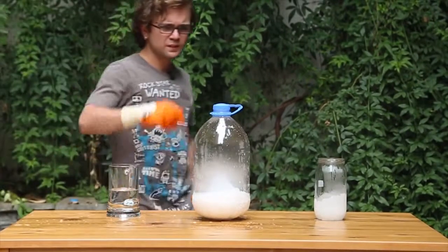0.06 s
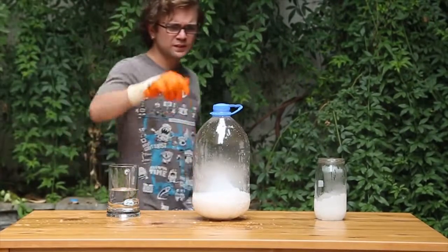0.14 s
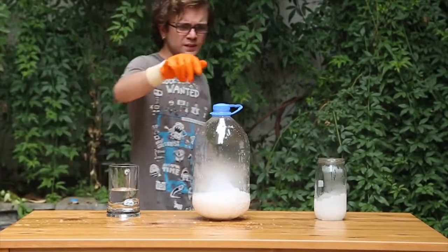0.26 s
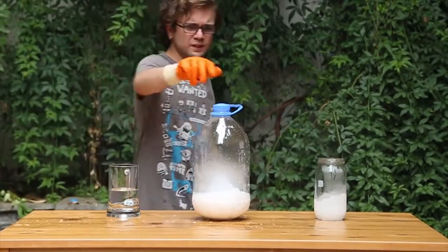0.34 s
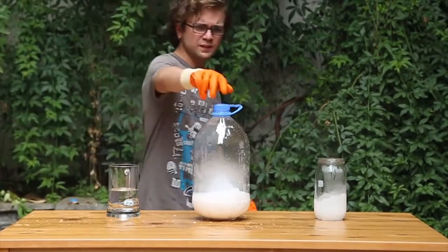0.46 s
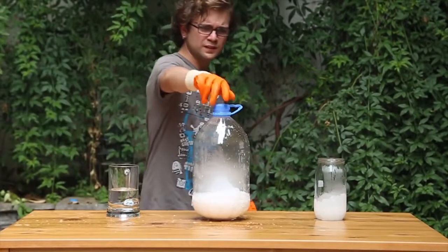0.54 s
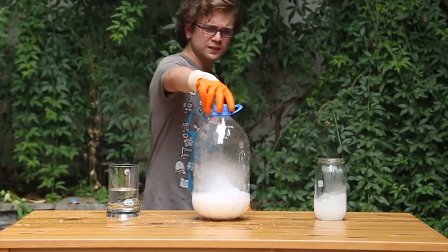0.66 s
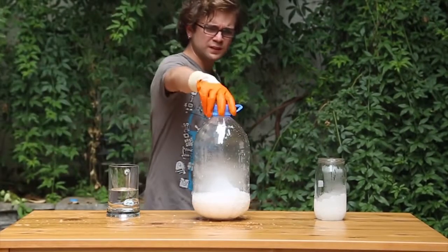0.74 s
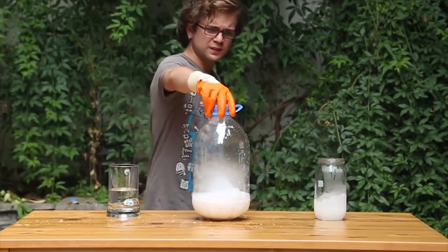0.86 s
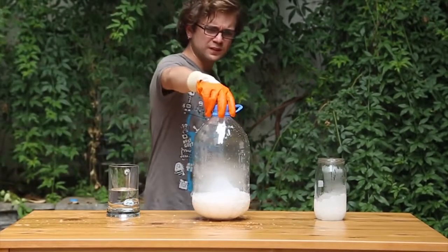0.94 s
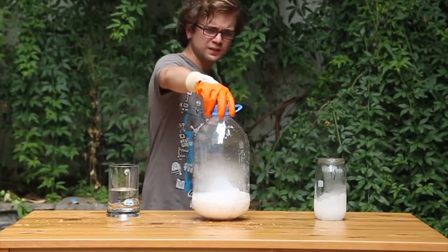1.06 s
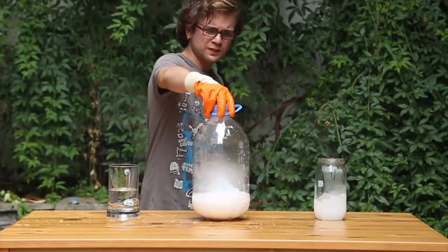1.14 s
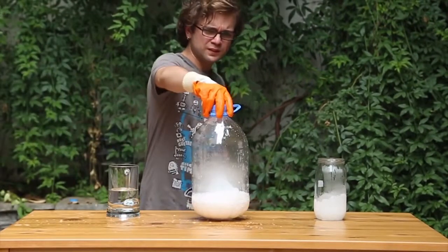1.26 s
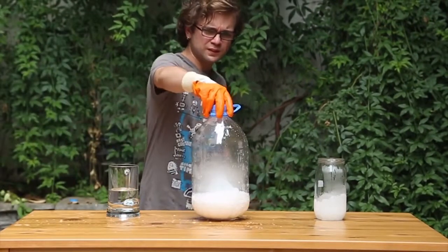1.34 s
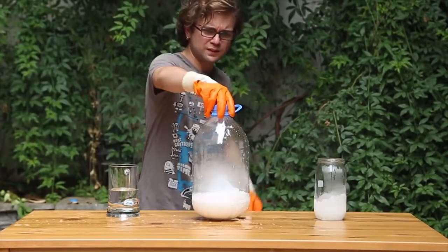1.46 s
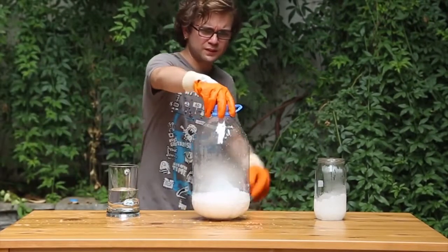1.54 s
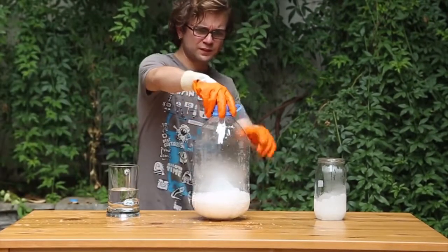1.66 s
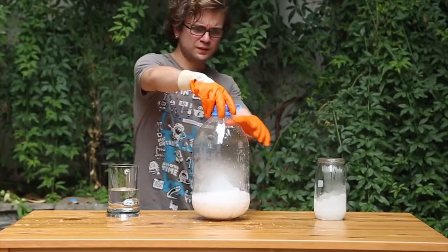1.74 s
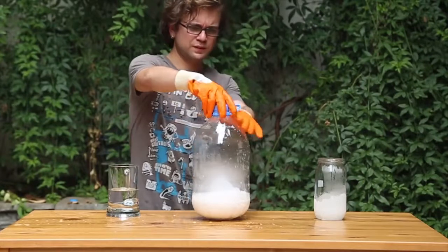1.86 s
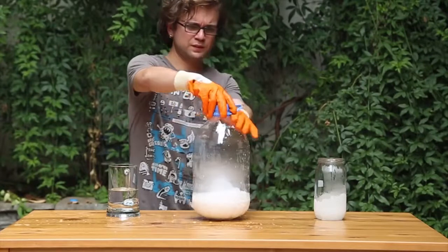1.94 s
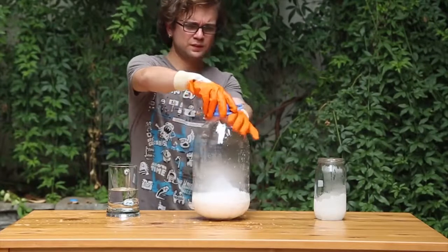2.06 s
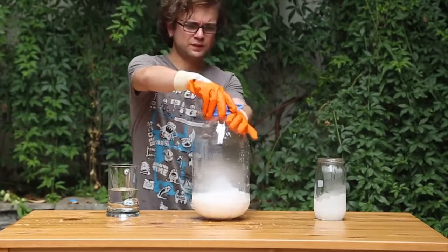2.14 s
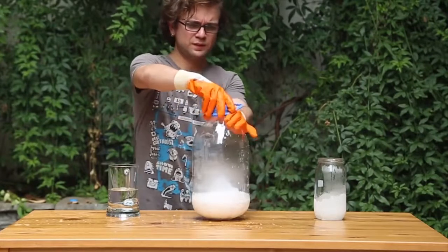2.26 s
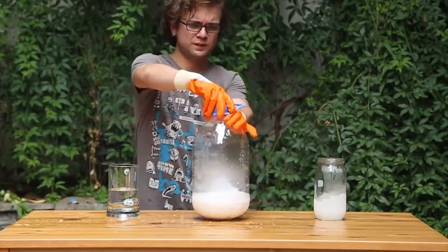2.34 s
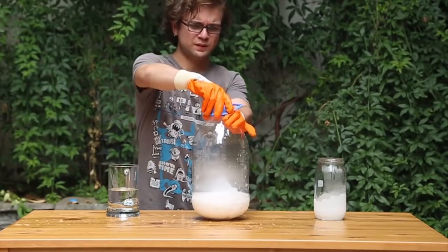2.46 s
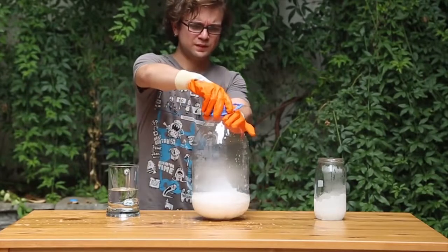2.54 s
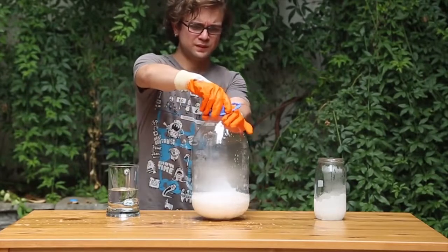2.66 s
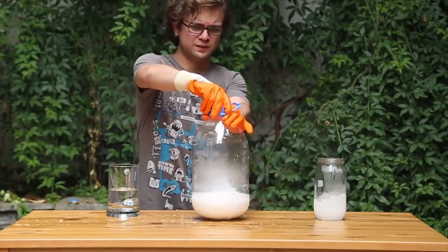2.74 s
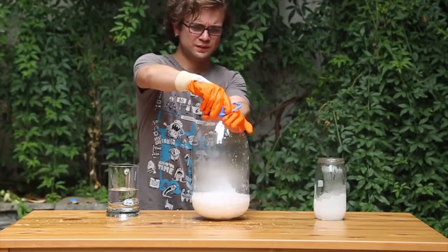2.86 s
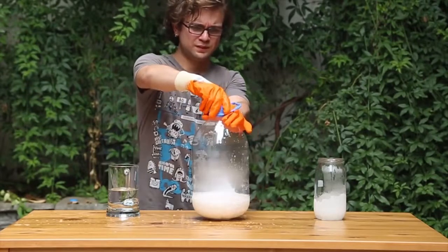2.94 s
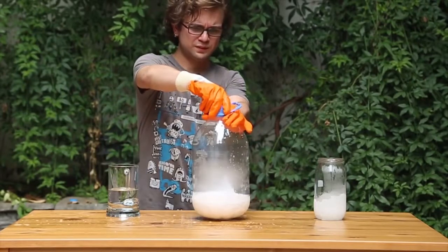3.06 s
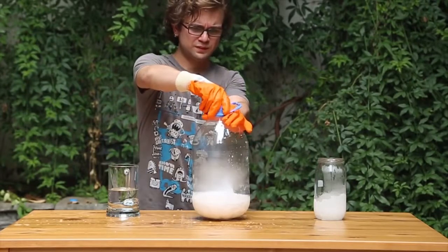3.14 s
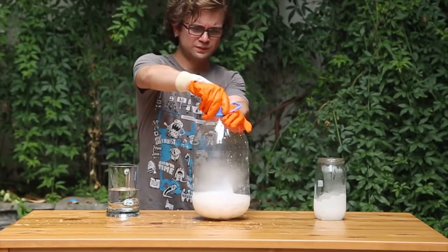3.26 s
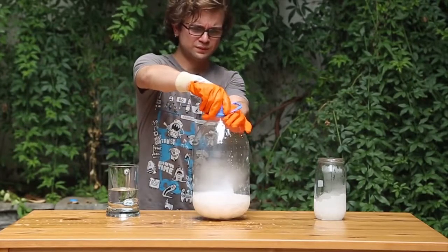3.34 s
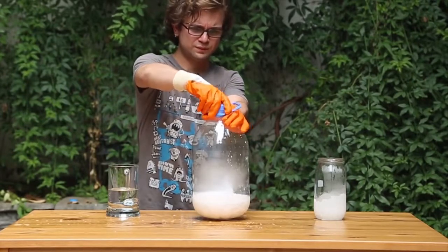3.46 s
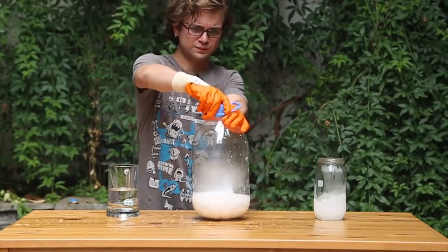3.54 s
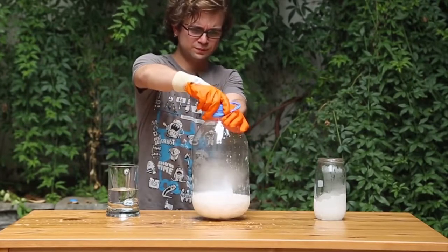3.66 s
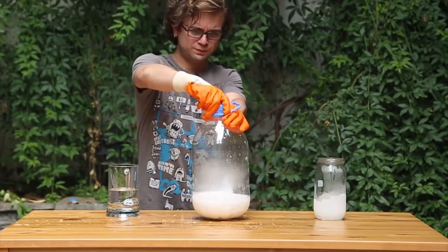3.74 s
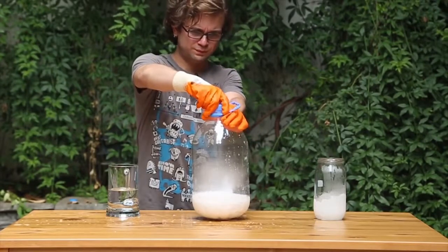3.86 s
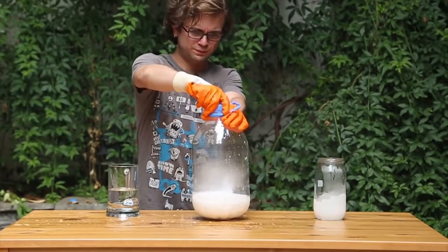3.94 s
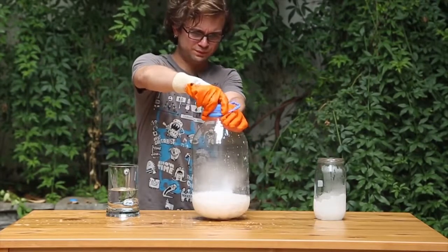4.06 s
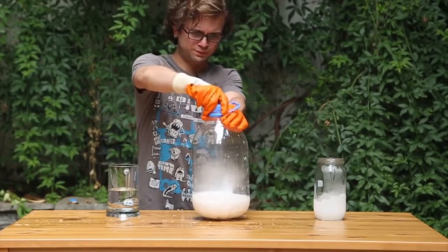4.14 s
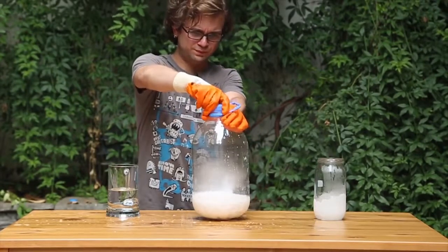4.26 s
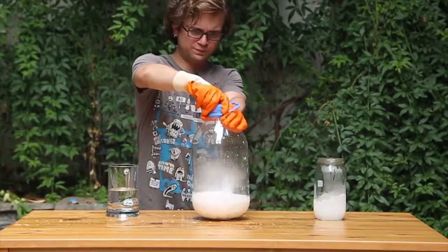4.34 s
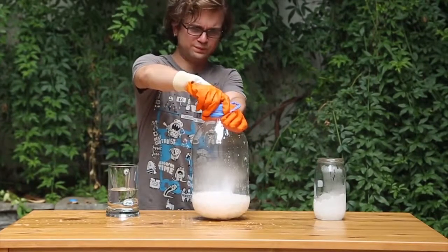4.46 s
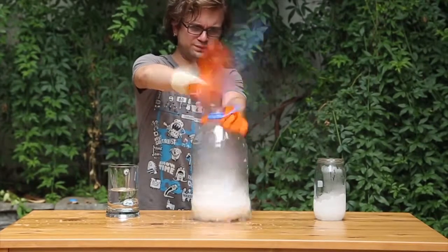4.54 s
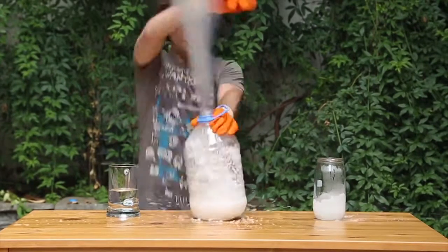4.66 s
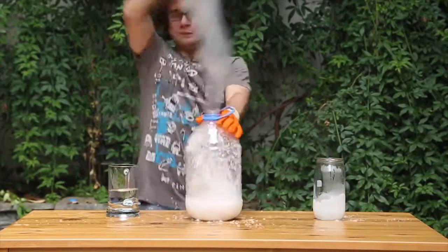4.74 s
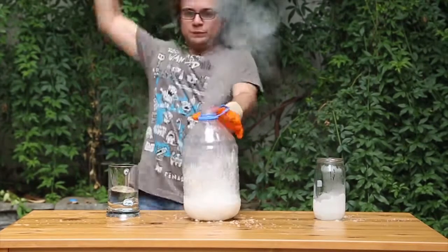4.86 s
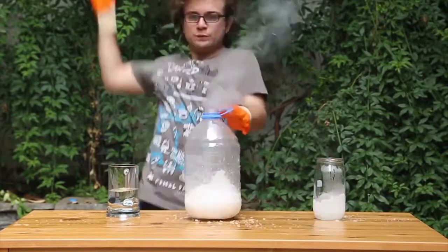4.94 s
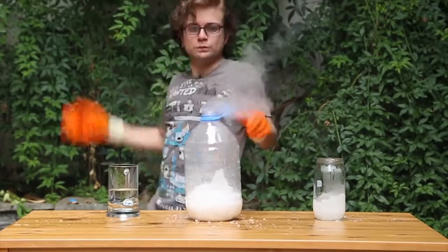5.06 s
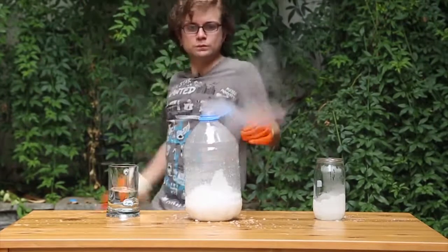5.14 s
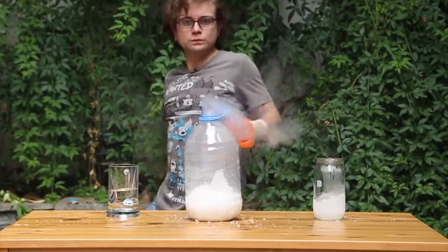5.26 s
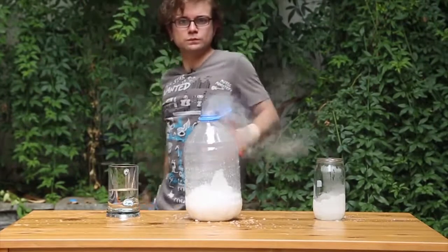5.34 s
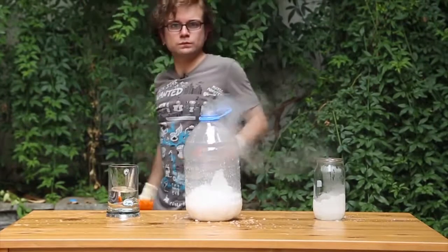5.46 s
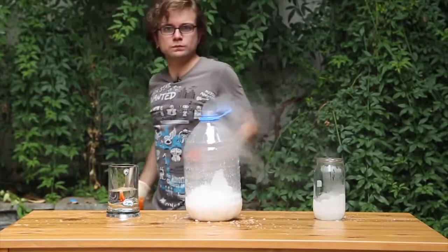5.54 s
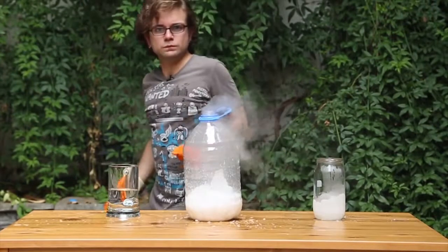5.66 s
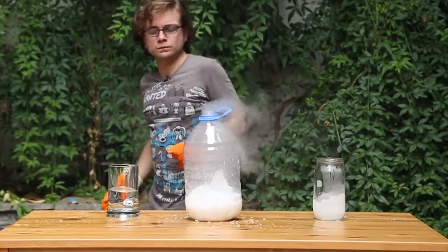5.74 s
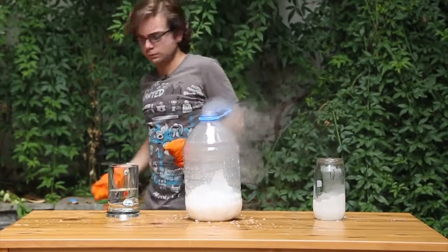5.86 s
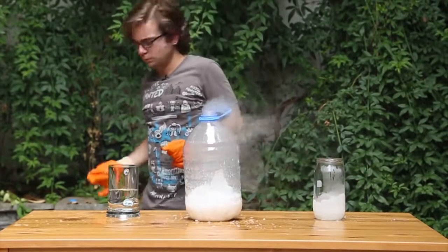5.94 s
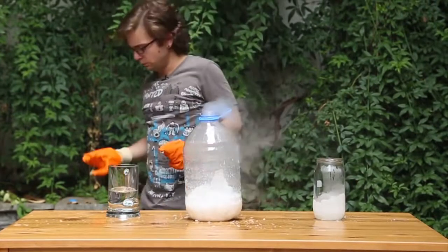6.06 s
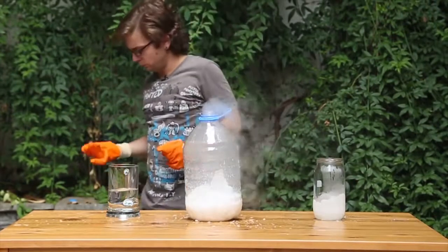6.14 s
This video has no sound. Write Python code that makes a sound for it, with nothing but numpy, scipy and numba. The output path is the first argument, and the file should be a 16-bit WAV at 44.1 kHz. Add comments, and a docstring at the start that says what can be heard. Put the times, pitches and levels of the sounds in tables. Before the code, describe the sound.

Pressurised gas hisses thinly from a capped plastic bottle with faint bubbling and glove creaks, then the cap bursts off with one loud overloaded bang.

```python
"""Gas hisses under a held-down cap over a faint boil: dry ice in a big plastic bottle in a walled garden.
The hiss is noise through sliding gap resonances, the boil noise through bottle-wall resonances. Gloves and
clothes rustle as scuffed noise, far chirps and hums glide, and the plastic ticks as struck modes.
Then the seal tears in rising noise, the cap pops off as a pulse and the gas gushes out in roar and jet noise;
the bottle air rings, the yard echoes, the microphone overloads, and hard bits land on the table."""
import sys
import numpy as np
from scipy import signal
from scipy.fft import rfft, irfft
from scipy.io import wavfile
from numba import njit

SR = 44100
rng = np.random.default_rng(int(sys.argv[2]) if len(sys.argv) > 2 else 0)


def generate_wav(sig):
    """Save sig (samples, or channels by samples) to the path in sys.argv[1] as 16-bit PCM at SR."""
    pcm = np.round(np.clip(np.atleast_2d(sig).T, -1, 1) * 32767).astype(np.int16)
    wavfile.write(sys.argv[1], SR, pcm)


N = 273678
TIME = np.arange(N) / SR
POP_S = 4.6664  # the cap leaves


def from_db(db):
    """Gain of a level in dB."""
    return 10 ** (np.asarray(db) / 20)


def rms_one(x):
    """Scales a sound to rms 1."""
    return x / np.sqrt(np.mean(x ** 2) + 1e-20)


def in_time(rows):
    """Reads each column of a curve table as one value per sample."""
    s, *columns = np.transpose(rows)
    return [np.interp(TIME, s, column) for column in columns]


def at_hz(points, hz):
    """Reads a spectrum on a log-frequency axis."""
    table = np.array(points)
    return np.interp(np.log(hz), np.log(table[:, 0]), table[:, 1])


def drift(rate):
    """Smooth random wandering of spread 1, faster for a higher rate in Hz."""
    step = 40  # computed on every 40th sample, then interpolated
    r = np.exp(-2 * np.pi * rate * step / SR)
    white = rng.standard_normal(N // step + 2002)
    slow = signal.lfilter([1], [1, -2 * r, r * r], white)[2000:]  # without the filter's start
    return np.interp(np.arange(N) / step, np.arange(len(slow)), rms_one(slow))


def coloured(spectrum, size=N):
    """Noise with the given spectrum, rms 1."""
    hz = np.maximum(np.arange(size // 2 + 1) * SR / size, 10)
    shaped = rfft(rng.standard_normal(size)) * from_db(at_hz(spectrum, hz))
    return rms_one(irfft(shaped, size))


@njit
def resonate(x, hz, width_hz, rate):
    """Two-pole resonance whose centre moves sample by sample."""
    y, r = np.zeros(len(x)), np.exp(-np.pi * width_hz / rate)
    for i in range(2, len(x)):
        turn = 2 * r * np.cos(2 * np.pi * hz[i] / rate)
        y[i] = x[i] - x[i - 2] + turn * y[i - 1] - r * r * y[i - 2]
    return y


def resonate_twice(x, hz, width_hz):
    """Two equal resonances in a row give steeper skirts."""
    return resonate(resonate(x, hz, width_hz, SR), hz, width_hz, SR)


# pitch of the three gap resonances under the cap: (t/s, low f/Hz, middle f/Hz, high f/Hz)
GAP_PITCH = [(0, 6700, 11500, 15300), (.6, 7200, 11600, 13400), (.85, 6830, 11600, 13950),
             (1.65, 6200, 11200, 13600), (1.95, 7850, 11200, 14500), (2.75, 7350, 10400, 13500),
             (3.5, 7800, 10800, 14500), (4.25, 8280, 11800, 13300), (4.61, 8000, 11400, 15100)]
# strength of the leak in each, before drift: (t/s, low level/dB, middle level/dB, high level/dB)
LEAK_LEVELS = [(0, -56.5, -50, -54), (.38, -57, -50.5, -49.5), (.62, -55.5, -52, -46), (.78, -58, -52, -47),
               (.82, -47.5, -62, -47.5), (1.08, -50.5, -53, -43.5), (1.45, -50.5, -47, -50),
               (1.72, -49.5, -53, -45), (1.95, -50, -48, -45.5), (2.14, -71, -45.5, -44.5),
               (2.53, -54, -47.5, -47.5), (2.85, -62, -47.5, -48.5), (3.099, -67, -43, -48),
               (3.31, -51, -41.5, -45), (3.5, -51, -44.5, -53), (3.7, -44.5, -47, -46),
               (3.92, -42, -44.5, -48), (4.35, -40, -44, -66), (4.53, -43.5, -49, -75),
               (4.61, -42.5, -67, -34)]
# width of each of the two passes, low to high resonance: width/Hz
LEAK_WIDTHS_HZ = [1800, 2200, 2400]
# relative spectrum of the broad hiss: (f/Hz, level/dB per Hz)
LEAK_BROAD_SPECTRUM = [(1500, -33), (3000, -20), (5000, -13), (9000, -4), (15000, -8.5)]
# the seal gapes or pinches for a moment: (t/s, length/s, change/dB)
SPURTS = [(1.854, 0.034, -3), (2.084, 0.072, 1.5), (3.04, 0.063, 3), (3.538, 0.083, 4.5),
          (3.918, 0.0045, 6.5), (3.93, 0.0098, 4), (4.023, 0.0034, 5), (4.224, 0.011, 2)]
SPURT_EDGE_S = 0.0011
LEAK_BROAD_DB = -3.5  # against the three resonances together
WHISTLE_HZ, WHISTLE_WIDTH_HZ, WHISTLE_DB = 7850, 350, -63  # level before drift


def leak():
    """Turbulent hiss shaped by the gap, whose resonances slide as the hands shift; it ends at the pop."""
    out, power, flutter = 0, 0, drift(25)
    for hz, level_db, width_hz in zip(in_time(GAP_PITCH), in_time(LEAK_LEVELS), LEAK_WIDTHS_HZ):
        band = resonate_twice(rng.standard_normal(N), hz, width_hz)
        out = out + rms_one(band) * from_db(level_db + 1.1 * drift(7.5))
        power = power + from_db(level_db) ** 2
    out = out + coloured(LEAK_BROAD_SPECTRUM) * np.sqrt(power) * from_db(LEAK_BROAD_DB)
    # a thin whistle of steady pitch in the hiss
    whistle = resonate_twice(rng.standard_normal(N), np.full(N, float(WHISTLE_HZ)), WHISTLE_WIDTH_HZ)
    out = out + rms_one(whistle) * from_db(WHISTLE_DB + 2.5 * drift(3))
    spurt_db = 0
    for s, length, change_db in SPURTS:
        inside = np.minimum(TIME - s, s + length - TIME)
        spurt_db = spurt_db + change_db * np.clip(inside / SPURT_EDGE_S + 1, 0, 1)
    return out * from_db(spurt_db + 0.71 * flutter) * (TIME < POP_S)


# boil heard through the bottle wall: (t/s, level/dB)
BOIL_LEVEL = [(0, -67), (.67, -71.5), (1.6, -61), (2.4, -58), (2.63, -55), (3.43, -51.5), (4.19, -53.5),
              (4.42, -56), (4.61, -55)]
# wall resonances, relative levels before drift: (f/Hz, width/Hz, level/dB)
WALL_MODES = [(850, 240, -4), (1340, 510, -5), (1926, 100, -4.5), (2777, 490, -4.5), (3924, 700, -5.5)]


def boil():
    """Dense bubble bursts heard through the resonances of the bottle wall, each fluttering on its own."""
    grains = rng.standard_normal(N) * from_db(1.5 * drift(80))
    body = np.zeros(N)
    for k, (hz, width_hz, level_db) in enumerate(WALL_MODES):
        band = rms_one(resonate(grains, np.full(N, float(hz)), width_hz, SR))
        body += band * from_db(level_db + 1.5 * drift(6.1)) * (-1) ** k  # alternating sign
    level_db, = in_time(BOIL_LEVEL)
    return rms_one(body) * from_db(level_db) * (TIME < POP_S)


@njit
def notched(x, hz, depth, width_hz, rate):
    """Takes a moving band out: the input minus its own resonance of top gain 1."""
    y, r = np.zeros(len(x)), np.exp(-np.pi * width_hz / rate)
    for i in range(2, len(x)):
        turn = 2 * r * np.cos(2 * np.pi * hz[i] / rate)
        y[i] = (1 - r * r) / 2 * (x[i] - x[i - 2]) + turn * y[i - 1] - r * r * y[i - 2]
    return x - depth * y


# echo off the moving forearm and chest, a fine comb that swirls: (t/s, delay/ms, strength/0-1)
BODY_ECHO = [(0, 1.1, 0), (.4, 1.9, 0.15), (.5, 0.94, 0.1), (1.6, 0.88, 0), (1.9, 1.2, .3), (2.2, 0.94, 0),
             (2.6, 0.83, .22), (3.5, .87, 0.1)]
# echoes off bottle shoulder, jar and table, before wander: (delay/ms, strength/0-1)
NEAR_ECHOES = [(1.15, 0), (1.401, .2), (1.65, 0.11), (2.0, 0)]
# bands cancelled by reflections off gloves and bottle neck, before wander and flicker;
# one table a notch: (t/s, f/Hz, depth/0-1)
NOTCHES = [
    [(0, 4260, 0.2), (.8, 3900, 0.13), (1.7, 3750, 0), (1.98, 5800, 0.2), (2.15, 5950, 0)],
    [(1.75, 12900, 0), (1.85, 12000, 0.9), (2.08, 10800, 0.7), (2.2, 10700, 0.4)],
    [(3.2, 6760, 0.26), (3.7, 6570, 1), (4.61, 6550, 0.94)],
    [(0, 8900, .75), (.7, 9340, .85), (1.6, 8800, 0.3), (2.2, 8200, 0.7), (2.65, 8900, .8),
     (3.5, 9330, 0.6), (4.3, 10440, 0.6), (4.61, 9800, .8)],
    [(0, 11200, 0.6), (.4, 10700, 0.9), (.5, 14300, 0.1), (1.35, 14500, 0.2), (1.55, 12900, 0.9),
     (2.0, 8500, 0.6), (2.15, 10360, .1), (2.55, 10600, 0.95), (3.1, 13500, .7), (3.7, 13600, 0.7),
     (4.61, 13700, .6)],
    [(0, 2470, 0), (2.0, 2290, .6), (2.4, 2000, 0.7), (4.61, 2100, 0.7)],
]
NOTCH_WIDTH_HZ, ECHO_WANDER_MS = 1470, 0.072
NOTCH_WANDER, NOTCH_FLICKER, NOTCH_DEEPEST = 0.014, 0.27, 0.91  # shares of pitch, of depth, top depth


def past_hands(x):
    """Short reflections comb the bottle's sound and cancel narrow bands that wander and flicker."""
    delay_ms, strength = in_time(BODY_ECHO)
    echoes = [(delay_ms, strength)]
    echoes += [(ms + ECHO_WANDER_MS * drift(1.0), share) for ms, share in NEAR_ECHOES]
    x = x + sum(share * np.interp(TIME - ms / 1000, TIME, x) for ms, share in echoes)
    for rows in NOTCHES:
        hz, depth = in_time(rows)
        hz = hz * (1 + NOTCH_WANDER * drift(3))
        depth = np.clip(depth * (1 + NOTCH_FLICKER * drift(3.6)), 0, NOTCH_DEEPEST)
        x = notched(x, hz, depth, NOTCH_WIDTH_HZ, SR)
    return x


# relative spectrum of the garden: (f/Hz, level/dB per Hz)
GARDEN_SPECTRUM = [(24, -30.5), (40, -0.5), (66, -0.5), (224, -4), (498, -7), (639, -9), (1110, -11.5),
                   (1220, -12.5), (1320, -12.5), (5460, -25), (7750, -28.5), (9950, -30), (15600, -35)]
GARDEN_DB = -57.5  # before drift


def garden_air():
    """A low-heavy bed of noise whose level drifts slightly."""
    return from_db(GARDEN_DB + .8 * drift(2.1)) * coloured(GARDEN_SPECTRUM)


# gloves, clothes and shoes, levels before drift:
# (t/s, length/s, scuff from f/Hz, to f/Hz, scuff level/dB, hiss level/dB)
RUSTLES = [(.21, .04, 1010, 1010, -61, -74), (0.412, .08, 10000, 15000, -52, -78),
           (0.898, 0.075, 700, 1420, -57, -56.5), (1.276, 0.1, 3520, 3530, -54.5, -60),
           (1.782, .15, 4500, 2870, -54.5, -63.5), (2.128, 0.054, 1060, 1060, -55, -73),
           (2.128, 0.051, 1700, 1800, -50.5, -73), (2.143, 0.038, 2900, 2900, -53.5, -70),
           (2.351, 0.2, 3820, 3840, -61.5, -61), (2.426, 0.044, 870, 865, -65, -70),
           (3.535, 0.089, 920, 920, -55.5, -53), (3.914, 0.079, 1900, 1930, -76, -60),
           (5.187, 0.024, 3770, 3750, -46, -53), (5.231, .22, 2550, 2540, -64, -60),
           (5.518, 0.037, 876, 906, -53.5, -51.5), (5.557, 0.028, 740, 727, -58, -53.5),
           (5.576, 0.013, 180, 180, -52.5, -70), (5.588, 0.093, 1000, 1000, -63.5, -59),
           (5.806, 0.084, 1168, 1160, -64, -59.5), (5.925, 0.062, 3960, 3990, -65.5, -57),
           (5.952, 0.057, 1087, 1120, -50, -52), (5.999, 0.089, 1200, 1206, -63.5, -60.5)]
# relative spectrum of the rustling hiss: (f/Hz, level/dB per Hz)
RUSTLE_SPECTRUM = [(300, 3), (1000, 4), (3500, -5.5), (6000, -9.5), (15500, -16)]


def rustles():
    """Short strokes of grainy friction: a broad scuff resonance plus hiss, quick to start, slower to fade."""
    out, size = np.zeros(N), 12000
    for s, length, from_hz, to_hz, scuff_db, hiss_db in RUSTLES:
        age = np.arange(size) / SR / length  # in stroke lengths
        stroke = np.minimum(age / 0.076, 1) * np.exp(-3.0 * np.maximum(age - .8, 0))
        pitch = from_hz + (to_hz - from_hz) * np.minimum(age, 1)
        scuff = resonate_twice(rng.standard_normal(size), pitch, 0.44 * from_hz)
        scuff = scuff / np.std(scuff[:int(length * SR)])
        hiss = coloured(RUSTLE_SPECTRUM, size=size)
        friction = stroke * (from_db(scuff_db) * scuff + from_db(hiss_db) * hiss)
        at = int(s * SR)
        out[at:at + size] += friction[:N - at]
    return out * from_db(1.5 * drift(150))


def glides(events, width_hz):
    """Narrow noise that slides in pitch while it swells and fades."""
    out = np.zeros(N)
    for s, length, from_hz, to_hz, level_db in events:
        share = np.arange(int(length * SR)) / SR / length
        noise = rng.standard_normal(len(share))
        glide = resonate(noise, from_hz + (to_hz - from_hz) * share, float(width_hz), SR)
        at = int(s * SR)
        out[at:at + len(share)] += from_db(level_db) * np.sin(np.pi * share) * rms_one(glide)
    return out


# faint, likely far birds, level before the swell: (t/s, length/s, from f/Hz, to f/Hz, level/dB)
CHIRPS = [(0.368, 0.036, 4100, 3730, -56), (0.382, 0.041, 2900, 2750, -64), (0.831, 0.046, 3960, 3370, -56),
          (0.856, 0.04, 2880, 2820, -55), (1.023, 0.012, 3780, 3500, -54), (1.335, 0.026, 2900, 2800, -56),
          (1.773, 0.051, 4720, 3300, -51), (1.814, 0.096, 2960, 2870, -64), (2.342, .035, 4300, 3760, -55),
          (2.382, 0.07, 4100, 3560, -53), (2.421, 0.03, 2750, 2620, -55), (2.784, 0.061, 4400, 4180, -55.5),
          (3.161, 0.03, 4200, 3720, -54)]


def chirps():
    """Short gliding noise bands 120 Hz wide."""
    return glides(CHIRPS, width_hz=120)


# faint and distant, level before the swell: (t/s, length/s, from f/Hz, to f/Hz, level/dB)
HUMS = [(.78, 0.48, 517, 513, -63), (2.02, 0.34, 286, 320, -65), (2.33, 0.22, 326, 365, -59.5),
        (2.5, 0.23, 367, 348, -61)]


def hums():
    """Longer low glides, only 5.1 Hz wide and so nearly tones."""
    return glides(HUMS, width_hz=5.1)


def ring(clicks, hz, t60):
    """A unit click sets a decaying sine of starting height 1 ringing."""
    r, w = from_db(-60 / (t60 * SR)), 2 * np.pi * hz / SR
    return signal.lfilter([0, np.sin(w)], [1, -2 * r * np.cos(w), r * r], clicks + 1e-18)


def struck(events, modes, trim_db):
    """Each event strikes every mode with a strength of its own; a third column tilts the modes."""
    rows, out = np.array([list(row) + [0] for row in events]), np.zeros(N)
    at = (rows[:, 0] * SR).astype(int)
    chance_db = rng.normal(0, 1.5, (len(rows), len(modes)))
    for k, (hz, level_db, t60) in enumerate(modes):
        tilt_db = rows[:, 2] * np.log2(hz / 2000)
        strike_db = rows[:, 1] + tilt_db + level_db + trim_db + chance_db[:, k]
        clicks = np.zeros(N)
        clicks[at] = from_db(strike_db) * (-1) ** k  # alternating sign
        out += ring(clicks, hz, t60)
    return out


# a strike is a short run of slips: (delay/ms, level/dB)
SLIPS = [(0, 0), (.35, -5), (1.15, -3)]


def slipping(x):
    """Repeats a strike as its run of slips, alternating in sign."""
    run = np.zeros(128)
    for k, (ms, level_db) in enumerate(SLIPS):
        run[int(ms * SR / 1000)] = from_db(level_db) * (-1) ** k
    return signal.lfilter(run, [1], x)


# plastic under the gloves, level before trim and chance: (t/s, level/dB, brightness/dB per octave)
TICKS = [(1.130, -37, 2), (1.243, -32, 2.5), (1.2682, -18, 2), (1.288, -35.5, -3), (1.3175, -34, 2),
         (1.422, -37.5, 7), (1.6352, -22, 2), (1.668, -37, 0.5), (2.02, -42, 4), (2.43, -44, -7.5),
         (2.581, -37.5, 1.5), (3.196, -36, 7), (3.44, -42, 9), (4.271, -37, 2), (4.562, -43, 5),
         (5.5195, -40.5, -4), (5.573, -40.5, -7.5)]
# modes of the plastic, relative levels: (f/Hz, level/dB, t60/s)
PLASTIC_MODES = [(279, -16.5, .02), (480, -10, 0.053), (730, -8.5, 0.024), (925, -9, 0.013),
                 (1370, -1.5, 0.024), (1950, -10, .012), (2350, -7.5, .01), (2940, -2, 0.012),
                 (3820, -1.5, 0.0077), (4830, -4, 0.0079), (5760, -7, 0.0079), (8000, -10.5, 0.0043),
                 (9600, -12.5, 0.0062)]


def ticks():
    """Slipping strikes set the modes of the plastic ringing briefly."""
    return slipping(struck(TICKS, PLASTIC_MODES, trim_db=-7.5))


# decay of the yard: (f/Hz, t60/s)
YARD_T60 = [(50, 0.66), (120, 1), (300, 0.94), (600, 0.91), (1100, 1), (2200, 1), (3000, .7), (4200, 0.84),
            (6000, 0.69), (12000, 0.47)]
YARD_DB, YARD_DELAY_S, YARD_LENGTH_S = -10.5, 0.011, 1.6
EDGES_HZ = 22 * 2 ** np.arange(0, 10, .4)  # band edges


def yard(x):
    """Walls and hedge return a dense tail that dies band by band."""
    size = int(YARD_LENGTH_S * SR)
    age, white, echo = np.arange(size) / SR, rng.standard_normal((2, size)), 0
    for k, (low, high) in enumerate(zip(EDGES_HZ, EDGES_HZ[1:])):
        sos = signal.butter(2, [low, high], "band", fs=SR, output="sos")
        band = signal.sosfilt(sos, white[k % 2])  # neighbouring bands use different noise
        echo = echo + band * from_db(-60 * age / at_hz(YARD_T60, np.sqrt(low * high)))
    echo = echo * (age > YARD_DELAY_S)
    echo = echo / np.sqrt(np.sum(echo ** 2))
    return from_db(YARD_DB) * signal.fftconvolve(x, echo)[:N]


# relative spectrum of the tearing seal: (f/Hz, level/dB per Hz)
TEAR_SPECTRUM = [(88, -34), (150, 2.5), (1300, -5.5), (2110, -9), (2880, -4.5), (4320, -9.5), (5150, -9),
                 (15600, -10)]
TEAR_S, TEAR_RISE_S, TEAR_FADE_S, TEAR_DB = 4.624, 0.018, 0.0045, -16.5


def tear():
    """The seal tears with a rising hiss that dies away once the cap has left."""
    rise = np.clip((TIME - TEAR_S) / TEAR_RISE_S, 0, 1) ** 2
    fade = np.exp(-np.maximum(TIME - POP_S, 0) / TEAR_FADE_S)
    return from_db(TEAR_DB) * rise * fade * coloured(TEAR_SPECTRUM)


POP_LENGTH_S, POP_DB = .0014, 8  # the pulse proper, before its weak tail; gain on its shape


def pop():
    """The cap leaves with an N-shaped pressure pulse and a short weak tail."""
    share = (TIME - POP_S) / POP_LENGTH_S
    pulse = np.interp(share, [0, .2, .3, .85, 1, 1.6, 5], [0, 1.0, -0.66, -1.5, 0.19, 0.062, 0])
    return from_db(POP_DB) * pulse


# gas from the open neck in two surges, before flutter: (t/s, roar level/dB, jet hiss level/dB)
GUSH_LEVELS = [(4.666, -31.5, -44.5), (4.669, -14, -25.5), (4.678, -14.5, -19.5), (4.684, -4, -13.5),
               (4.697, -3, -13.5), (4.707, -17.5, -12), (4.72, -15, -12), (4.80, -17, -16),
               (4.85, -24.5, -24.5), (4.95, -44, -41.5)]
# relative spectrum of the roar: (f/Hz, level/dB per Hz)
ROAR_SPECTRUM = [(30, -14.5), (60, -8), (100, -4), (170, -6), (350, -3.5), (700, -7), (1200, -3),
                 (1600, -9), (2400, -12.5), (3000, -18), (4500, -25.5)]
# relative spectrum of the jet hiss: (f/Hz, level/dB per Hz)
JET_SPECTRUM = [(500, -12.5), (1500, -7.5), (2800, -4.5), (4200, -1.5), (6000, -5.5), (10000, -7),
                (15500, -19)]
ROAR_FADE_DB_PER_S, JET_FADE_DB_PER_S = 94, 65  # as the bottle empties, after the last row


def gush():
    """Gas rushes out as a low roar and a brighter jet hiss, each fluttering, then fading."""
    roar_db, jet_db = in_time(GUSH_LEVELS)
    emptying = np.maximum(TIME - GUSH_LEVELS[-1][0], 0)
    roar = coloured(ROAR_SPECTRUM) * from_db(roar_db - ROAR_FADE_DB_PER_S * emptying + 2.4 * drift(64))
    jet = coloured(JET_SPECTRUM) * from_db(jet_db - JET_FADE_DB_PER_S * emptying + 0.86 * drift(60))
    return (roar + jet) * (TIME > GUSH_LEVELS[0][0])


# the cap leaving and the second, louder surge, level before trim and chance: (t/s, level/dB)
CAVITY_KICKS = [(4.667, -4), (4.688, -1)]
# air in the open bottle, relative levels: (f/Hz, level/dB, t60/s)
CAVITY_MODES = [(45, -15.5, .1), (84.9, -22.5, 0.79), (113, -6, 0.17), (238.4, -17, 0.35),
                (334, -13.5, 0.18)]


def cavity_boom():
    """Two kicks set the air in the open bottle ringing low."""
    return struck(CAVITY_KICKS, CAVITY_MODES, trim_db=-1.0)


# small hard bits landing on the table, level before trim and chance: (t/s, level/dB)
BITS = [(5.187, -31), (5.384, -24), (5.416, -45), (5.572, -40)]
# modes of the bits, relative levels: (f/Hz, level/dB, t60/s)
BIT_MODES = [(6000, -1, 0.0034), (7500, -3, 0.0038), (11100, -2, 0.0033), (12770, -7, 0.0049),
             (14900, -11, .005)]


def bits():
    """Each landing rings high, very short modes in the same run of slips as a tick."""
    return slipping(struck(BITS, BIT_MODES, trim_db=-9.5))


def scene():
    """Bottle and hands near the microphone, the garden around."""
    bottle = past_hands(leak() + boil())
    garden = garden_air() + chirps() + hums()
    strikes = ticks() + bits()
    blast = tear() + pop() + gush()
    echoes = yard(blast + from_db(-10.5) * strikes)  # strikes excite the yard less
    return (bottle + garden + rustles() + strikes + blast + cavity_boom() + echoes)[None]


OVERLOAD_TOP, OVERLOAD_KNEE = 0.89, 4.5  # ceiling at full scale 1, hardness of the bend
STOP_HZ = 15860  # from here up the treble is 60 dB down


def record(dry):
    """The input stage bends loud peaks towards a ceiling, then a steep low-pass cuts the top."""
    bend = (1 + np.abs(dry / OVERLOAD_TOP) ** OVERLOAD_KNEE) ** (1 / OVERLOAD_KNEE)
    low_pass = signal.cheby2(24, 60, STOP_HZ, fs=SR, output="sos")
    return signal.sosfilt(low_pass, dry / bend)


dry = scene()
out = record(dry)
generate_wav(out)
```